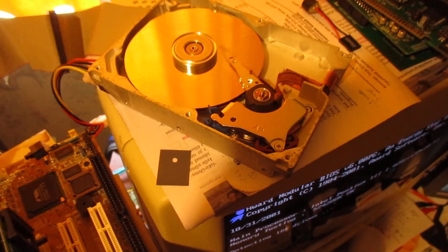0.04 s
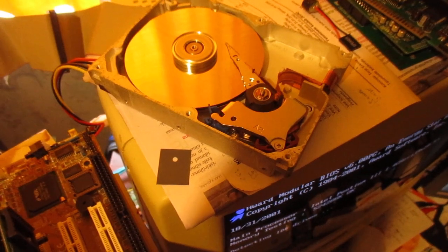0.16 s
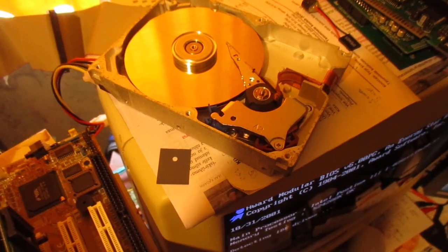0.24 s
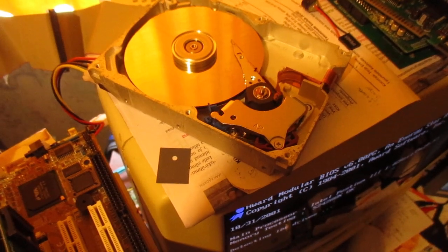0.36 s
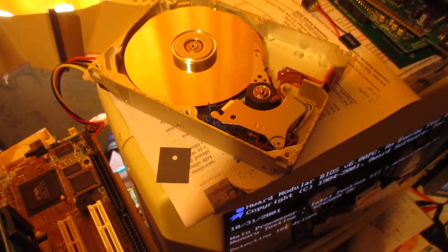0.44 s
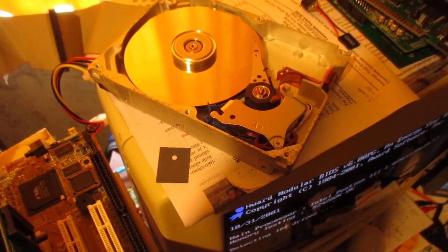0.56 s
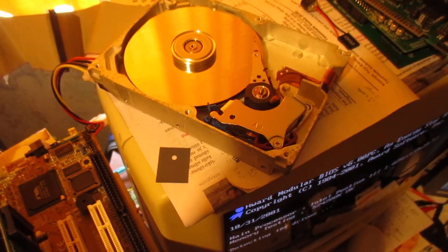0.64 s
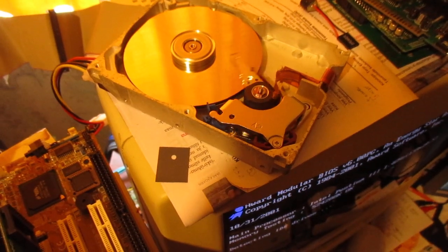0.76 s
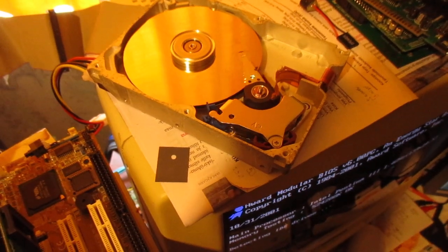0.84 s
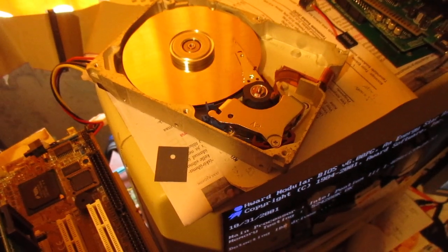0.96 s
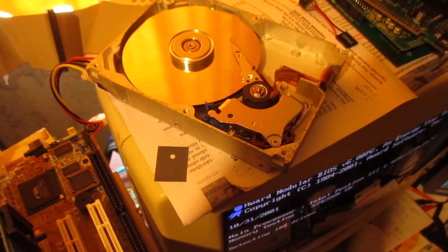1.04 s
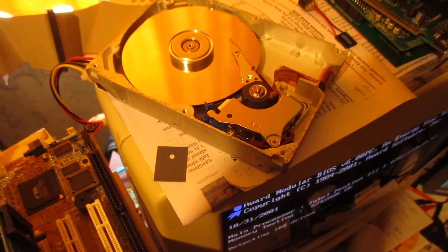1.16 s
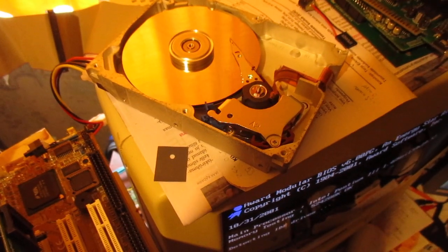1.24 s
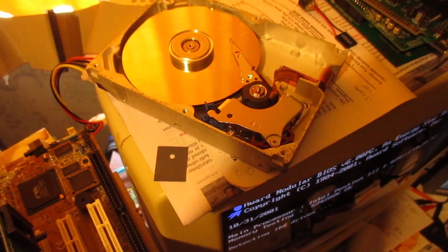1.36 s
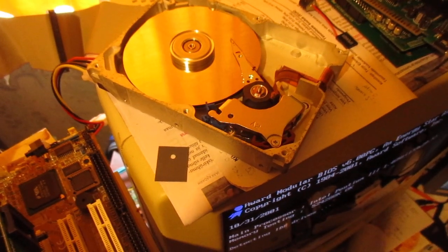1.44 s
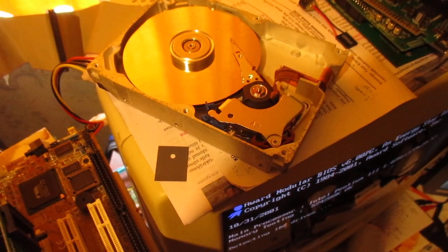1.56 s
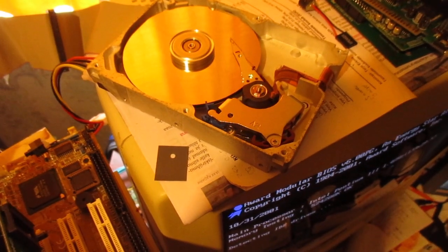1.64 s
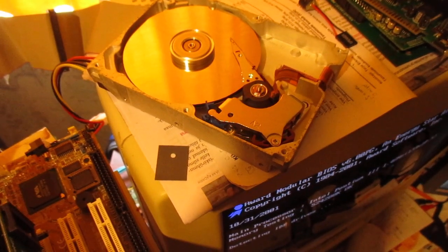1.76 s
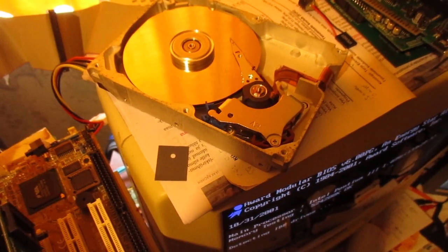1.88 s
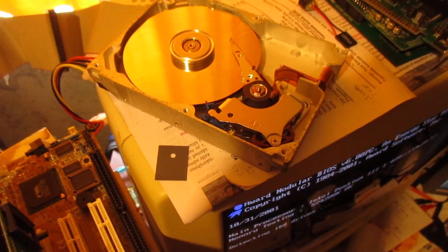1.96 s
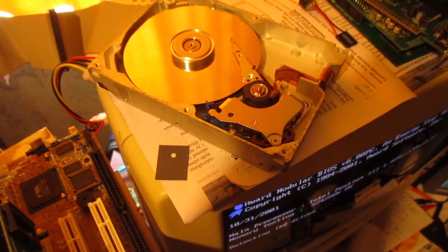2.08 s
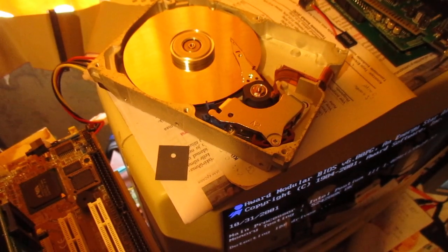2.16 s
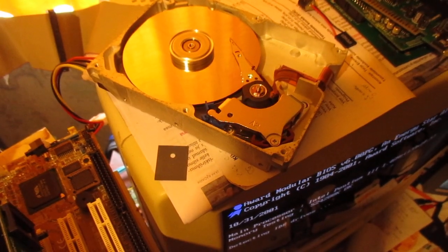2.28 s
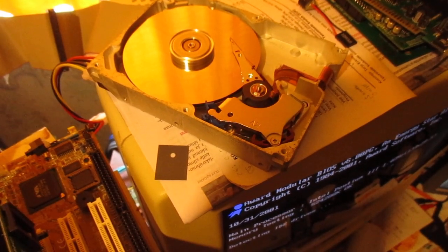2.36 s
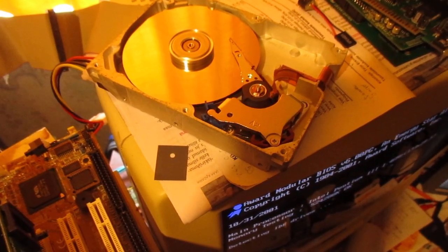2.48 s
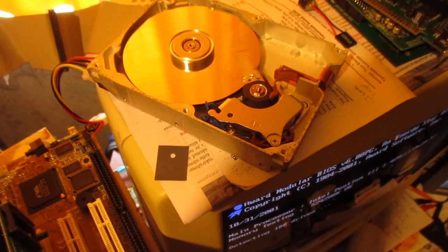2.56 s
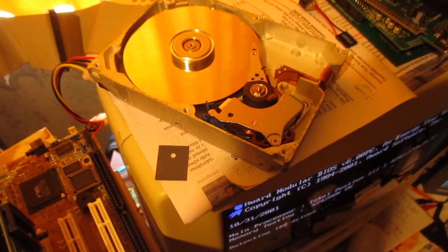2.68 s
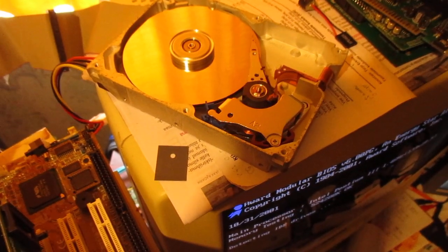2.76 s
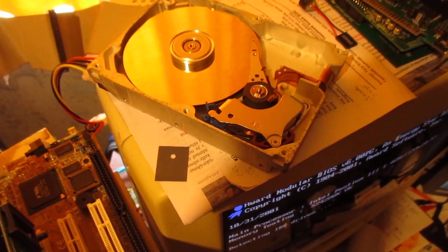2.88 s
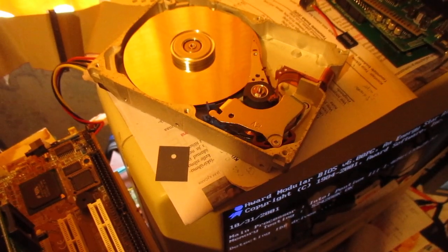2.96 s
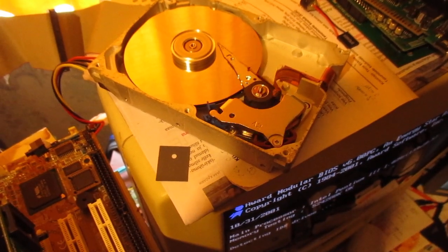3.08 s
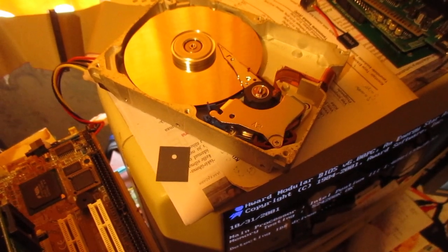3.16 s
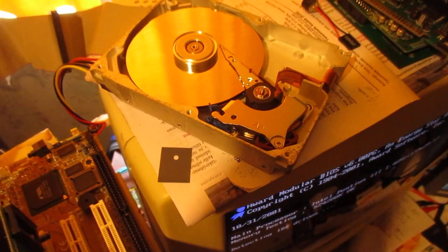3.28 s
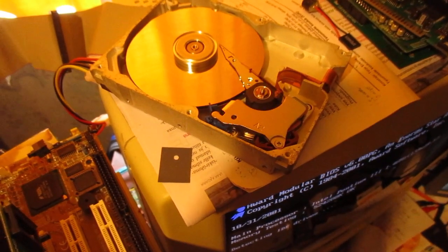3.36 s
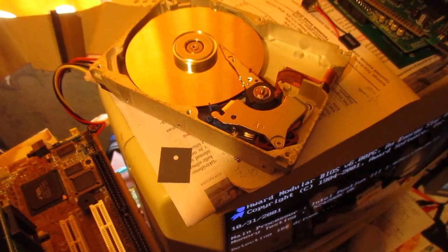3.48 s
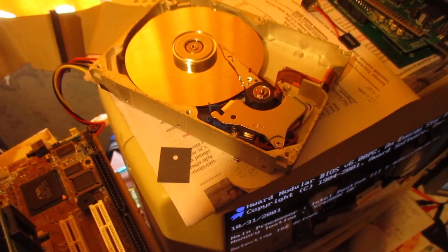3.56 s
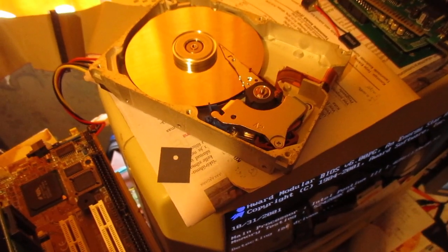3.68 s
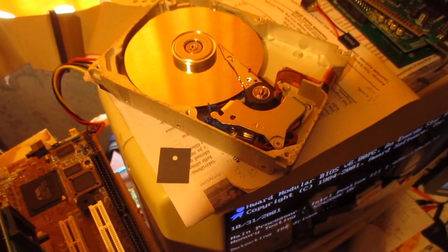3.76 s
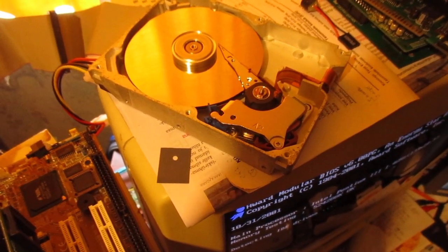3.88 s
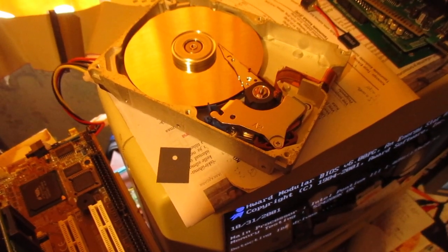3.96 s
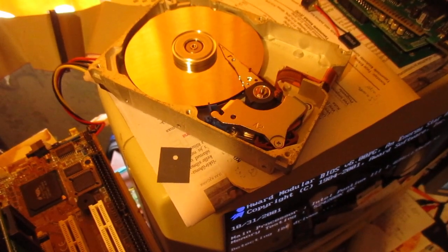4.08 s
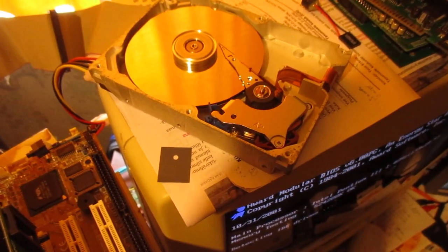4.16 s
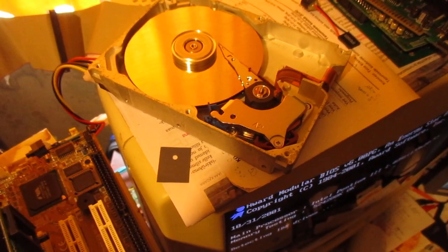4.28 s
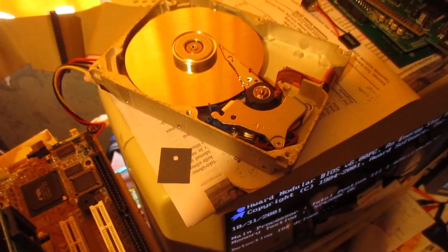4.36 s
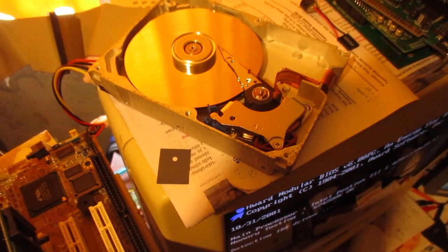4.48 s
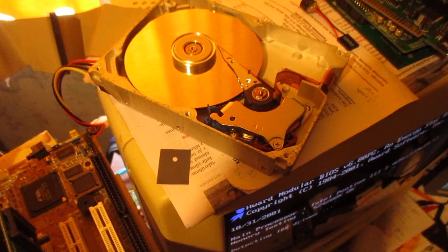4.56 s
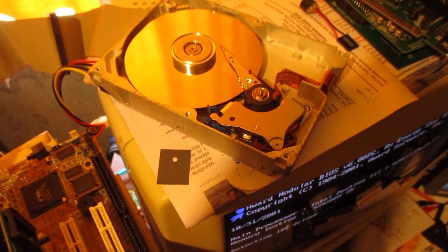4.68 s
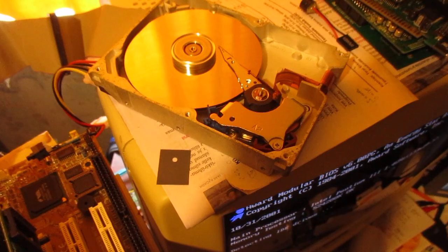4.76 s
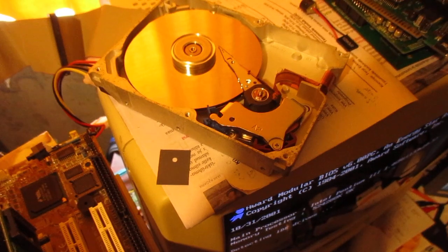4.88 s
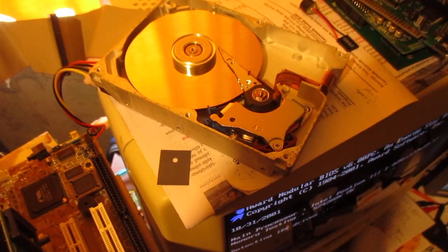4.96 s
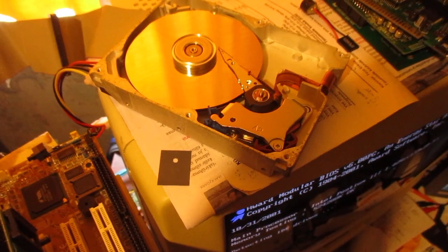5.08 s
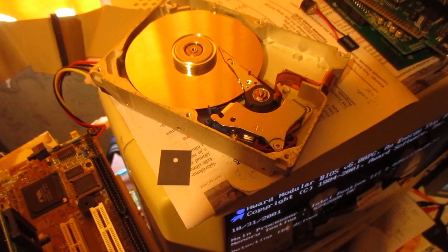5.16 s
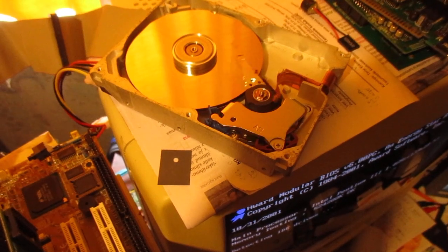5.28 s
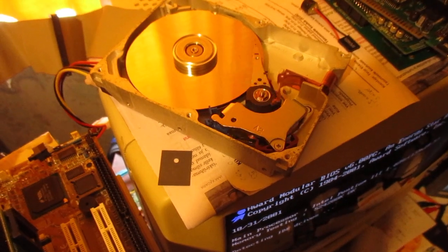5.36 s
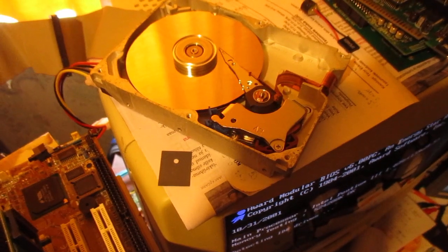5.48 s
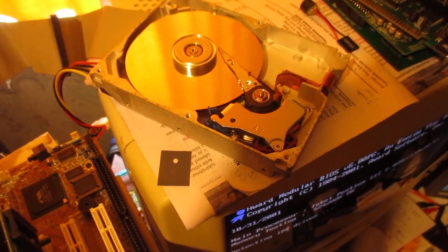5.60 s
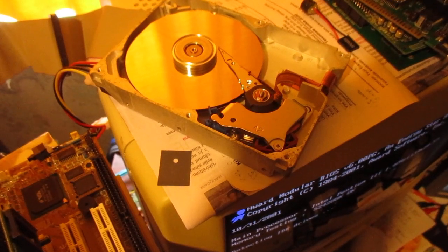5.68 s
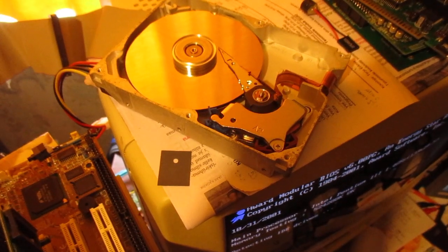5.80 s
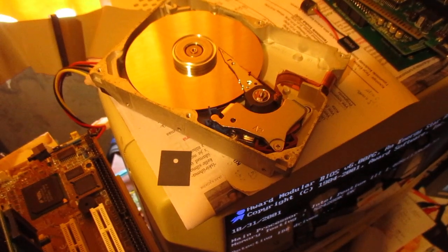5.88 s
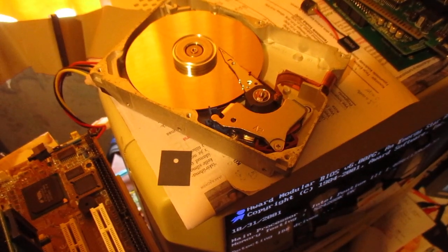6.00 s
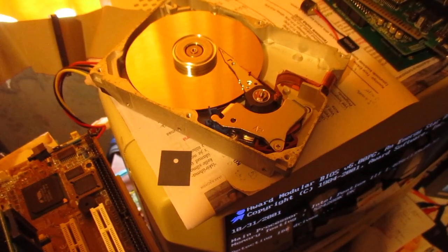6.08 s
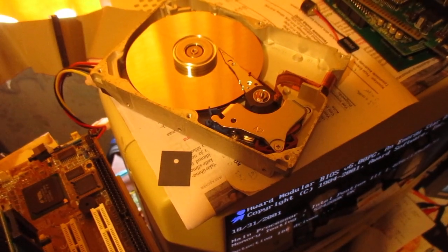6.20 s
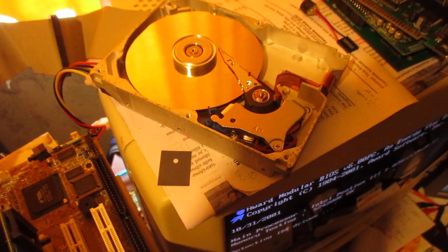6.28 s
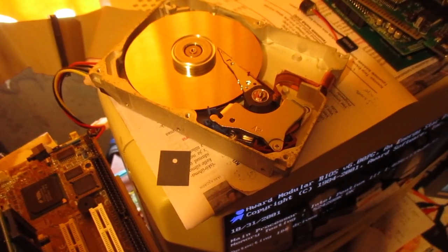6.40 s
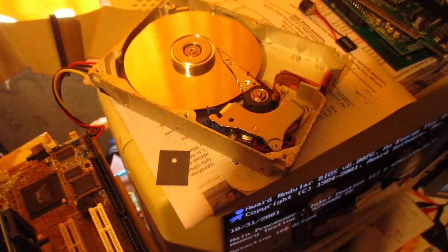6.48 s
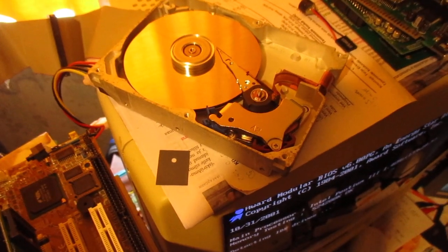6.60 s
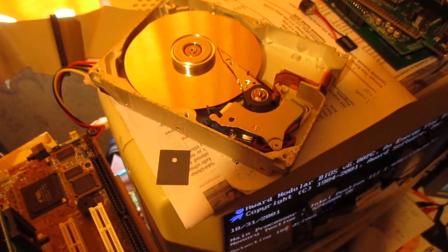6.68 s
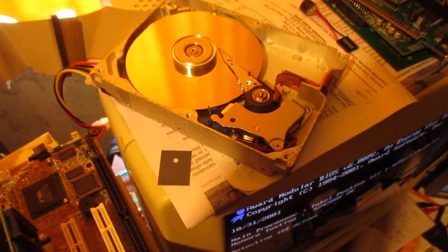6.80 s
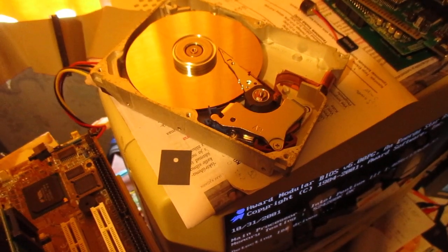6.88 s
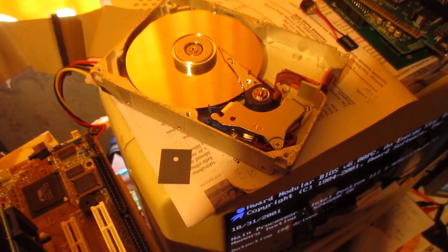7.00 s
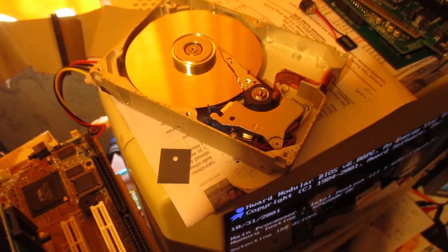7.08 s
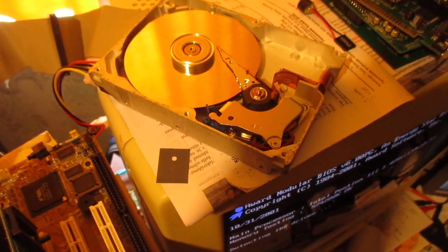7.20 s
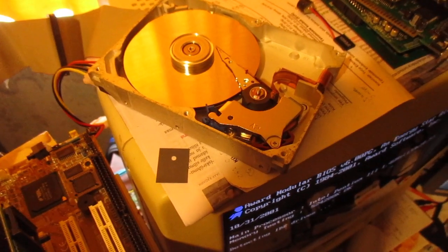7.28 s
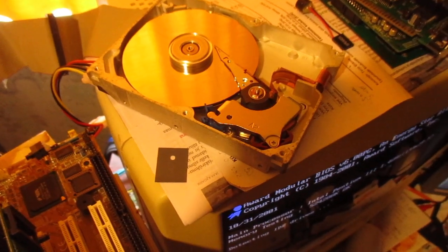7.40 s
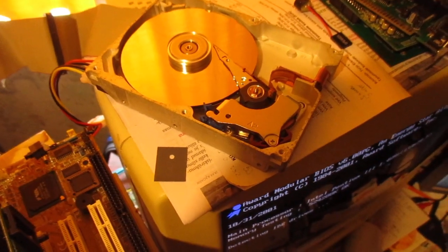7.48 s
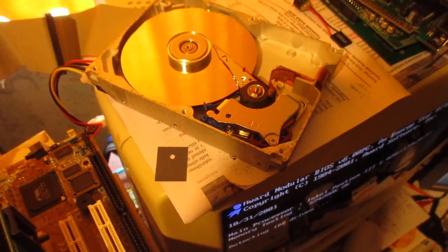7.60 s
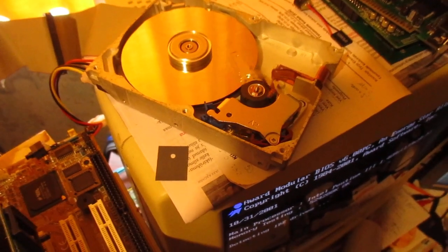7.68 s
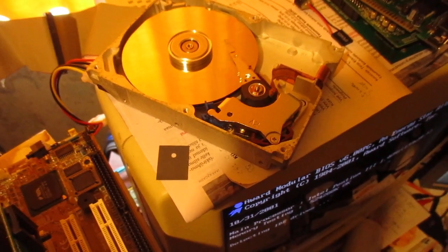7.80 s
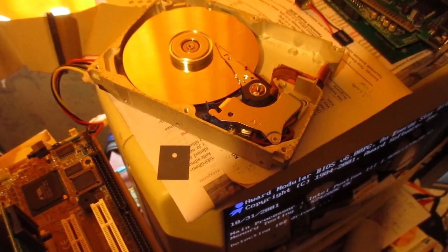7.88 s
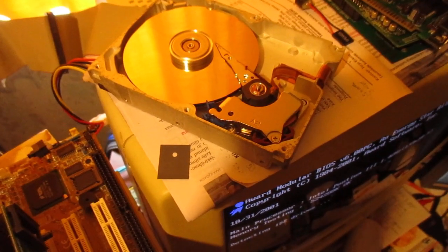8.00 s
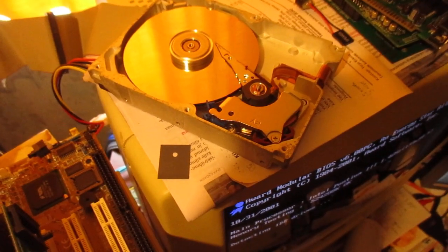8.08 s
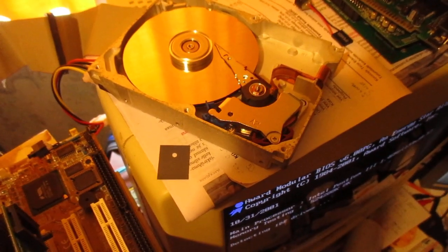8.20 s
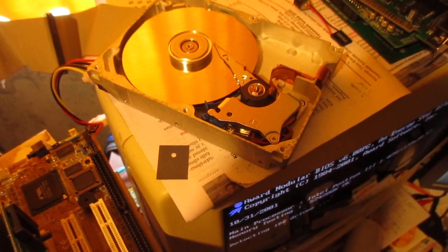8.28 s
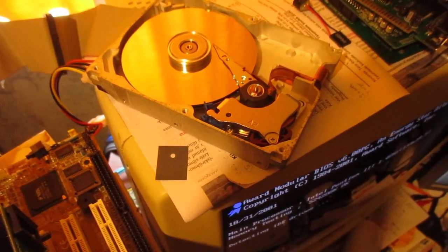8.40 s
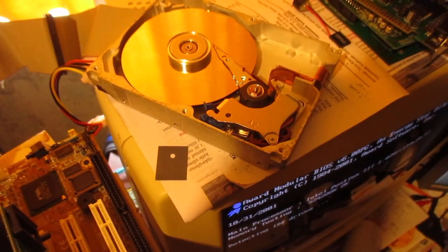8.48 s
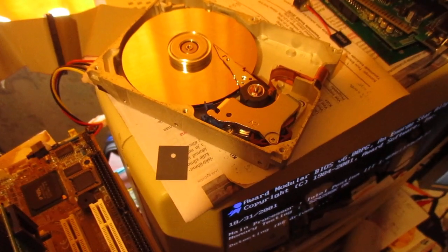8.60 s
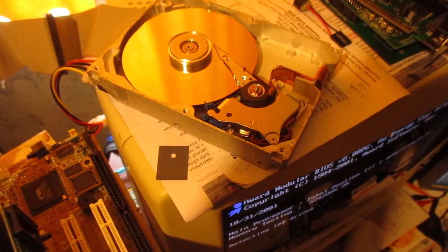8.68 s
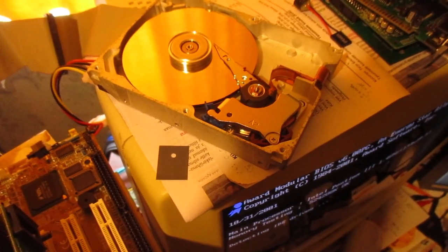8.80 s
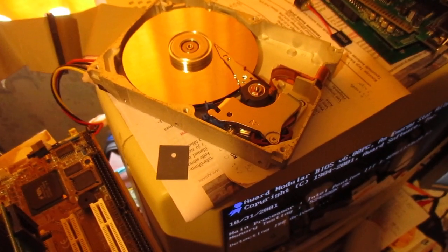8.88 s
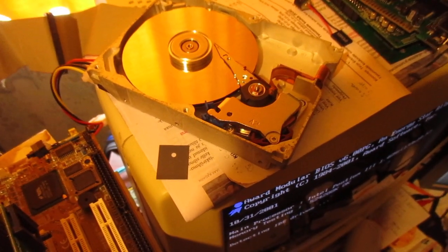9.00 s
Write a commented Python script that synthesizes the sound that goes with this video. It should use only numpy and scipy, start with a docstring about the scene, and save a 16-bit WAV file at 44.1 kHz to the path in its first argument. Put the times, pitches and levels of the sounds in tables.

```python
"""On a desk in a small room lies an opened hard drive, heard from close by.
Four times its spindle speeds up, coasts back and is caught again by the motor.
Ball bearing and motor sing thin tones that swell as they cross the resonances of the metal case,
over a roar of bearing and platter wind. The head arm swings into its stop and bounces."""
import sys
import numpy as np
from scipy import signal
from scipy.fft import rfft, irfft
from scipy.io import wavfile
from scipy.ndimage import uniform_filter1d

SR = 44100
rng = np.random.default_rng(int(sys.argv[2]) if len(sys.argv) > 2 else 0)


def log_audio(samples):
    """Write samples as a 16-bit WAV file to the path given in sys.argv[1]."""
    # one column per channel
    frames = np.atleast_2d(samples).T
    # limit to full scale, then quantise
    limited = np.clip(frames, -1, 1)
    pcm = np.round(limited * 32767).astype(np.int16)
    wavfile.write(sys.argv[1], SR, pcm)


N = 399099
STEP = 100  # samples between the values of a slow curve
SHAFT_PER_BALL = .10983  # shaft turns for each ball that rolls past


def undb(db):
    """Turn decibels into a gain."""
    return 10 ** (np.asarray(db) / 20)


def wander(rate_hz):
    """A slow curve that drifts at random, with a spread of 1."""
    width = max(int(SR / STEP / rate_hz), 2)
    drift = uniform_filter1d(uniform_filter1d(rng.standard_normal(N // STEP + 2), width), width)
    return drift / drift.std()


def filtered(x, gain):
    """Make each frequency f louder or softer by gain(f)."""
    return irfft(rfft(x) * gain(np.fft.rfftfreq(N, 1 / SR)), N)


def desk_echo(x, t60_s=0.15, wet_db=-14):
    """Desk and room add a short tail that fades by 60 dB in t60_s."""
    t = np.arange(SR // 3) / SR
    tail = rng.standard_normal(len(t)) * np.exp(-np.log(1000) * t / t60_s) * np.minimum(t / 0.033, 1)
    return x + undb(wet_db) * signal.fftconvolve(x, tail / np.sqrt(np.sum(tail ** 2)))[:N]


# Spindle cycles: speeds up t/s, switched off t/s, caught t/s, time constant of the climb t/s
SPIN_CYCLES = [(.76, 1.818, 2.244, .796), (3.023, 3.843, 4.363, 1.029), (5.444, 6.18, 6.742, 1.027),
               (7.823, 8.585, 9.105, .927)]
def ball_rate():
    """Balls rolling past per second: the rate climbs, coasts evenly down, is caught and settles."""
    hold_hz, peak_hz, caught_hz = 487.47, 537.16, 485.26
    settle_s, inertia_s = .113, .051
    t = np.arange(N) / SR
    hz = 488.47 - 4.38 * t  # sags a little before the first climb
    for climb, coast, caught, lag_s in SPIN_CYCLES:
        start_hz = hz[int(climb * SR)]
        climbed = np.expm1((climb - t) / lag_s) / np.expm1((climb - coast) / lag_s)
        hz = np.where(t > climb, start_hz + (peak_hz - start_hz) * climbed, hz)
        hz = np.where(t > coast, peak_hz - (peak_hz - caught_hz) * (t - coast) / (caught - coast), hz)
        hz = np.where(t > caught, hold_hz - (hold_hz - caught_hz) * np.exp((caught - t) / settle_s), hz)
    width = int(inertia_s * SR)
    return uniform_filter1d(uniform_filter1d(hz, width, mode="nearest"), width, mode="nearest")


def spindle_state():
    """Three slow curves from 0 to 1: holding speed, speeding up, coasting."""
    t = np.arange(N // STEP + 2) * STEP / SR
    rising = sum((t > climb) * (t <= coast) * 1. for climb, coast, _, _ in SPIN_CYCLES)
    coasting = sum((t > coast) * (t <= caught) * 1. for _, coast, caught, _ in SPIN_CYCLES)
    rising, coasting = uniform_filter1d([rising, coasting], size=6)
    return np.array([1 - rising - coasting, rising, coasting])


# Pitches at which the cast metal case rings: f/Hz, width/Hz, level/dB
CASE_RESONANCES = [(494.5, 8.4, 14.5), (2759, 58, 20), (2916, 149, 18.5), (3246, 450, 7.5),
                   (3693, 107, 7.5), (3860, 180, 4.5), (4266, 170, 7), (4610, 59, 19), (4810, 60, 18),
                   (4980, 280, 12.5), (5360, 510, 9), (5696, 345, 14.5), (6325, 226, 12.5),
                   (7647, 580, 9.5), (8385, 163, 14.5), (8916, 200, 7.5), (9330, 250, 3), (9760, 200, 11.5),
                   (10480, 180, 9.5), (11290, 280, 17.5), (11750, 81, 11), (11600, 55, 7), (12600, 183, 5),
                   (13089, 77, 5), (13280, 125, -1)]
def case_gain(f):
    """The case boosts sound near its resonances, above a flat floor of -2 dB."""
    peaks = sum(undb(db) ** 2 / (1 + (2 * (f - hz) / width) ** 2) ** 2
                for hz, width, db in CASE_RESONANCES)
    return np.sqrt(undb(-2) ** 2 + peaks)


# Tone colour of the roar, with the room's rumble beneath: f/Hz, relative level/dB
ROAR_COLOUR = [(15, -48), (25, -16), (120, -7), (659, -8), (734, -5.5), (1290, -10.5), (1940, 0.5),
               (2410, -7.5), (2840, -3.5), (3620, -14), (4740, -9), (5430, -14.5), (10400, -26.5),
               (11600, -22), (16000, -26.5)]
# How loud the roar is over time: t/s, level/dB between 1500 and 2400 Hz
ROAR_LOUDNESS = [(0.0, -49), (0.15, -45.5), (0.73, -45), (1.39, -43.5), (5.22, -46), (5.44, -44),
                 (7.08, -46), (9.05, -45)]
def roar(ball_passes):
    """Bearing and platter wind shake the case: noise, plus a rough pattern that repeats every turn."""
    pattern = rng.standard_normal(1024)
    repeating = np.interp(SHAFT_PER_BALL * ball_passes % 1, np.arange(1024) / 1023, pattern)
    repeating = filtered(repeating, lambda f: 1 / (1 + (1700 / (f + 1)) ** 6))  # fine grain, no bass
    throb = 1 + 0.28 * np.sin(2 * np.pi * ball_passes)
    rough = rng.standard_normal(N) * throb + 0.87 * repeating
    hz, db = np.transpose(ROAR_COLOUR)

    def colour(f):
        shape = undb(np.interp(np.log(f + 1), np.log(hz), db))
        softer_top = 0.49 + 0.49 / (1 + (f / 12100) ** 30)
        return shape * case_gain(f) ** 0.27 * softer_top

    noise = filtered(rough, colour)
    middle = filtered(noise, lambda f: (f > 1500) * (f < 2400))
    rumble = filtered(noise, lambda f: 1 / (1 + (f / 900) ** 4))  # this part stays steady
    level = undb(np.interp(np.arange(N) / SR, *np.transpose(ROAR_LOUDNESS)))
    return ((noise - rumble) * level + rumble * level.mean()) / middle.std()


# A high band of hiss: f/Hz, width/Hz, level/dB, extra when it flares/dB, reach of the flare/Hz
HISS_BAND = (11290, 500, -65.5, 7.5, 90)
def hiss(ball_hz):
    """Bearing noise feeds a high resonance, which flares when a multiple of the ball rate crosses it."""
    hz, width_hz, db, flare_db, reach_hz = HISS_BAND
    miss_hz = hz - np.round(hz / ball_hz) * ball_hz
    band = filtered(rng.standard_normal(N), lambda f: 1 / (1 + (2 * (f - hz) / width_hz) ** 4))
    return undb(db + flare_db * np.exp(-(miss_hz / reach_hz) ** 2)) * band / band.std()


def tone(cycles, level, flutter_db=1.2):
    """One thin tone that follows the spindle; its loudness flutters and slowly swells."""
    flutter = undb(flutter_db * (wander(rate_hz=27) + 1.52 * wander(rate_hz=3.3)))
    loudness = np.interp(np.arange(N), np.arange(len(flutter)) * STEP, level * flutter)
    return np.sqrt(2) * loudness * np.sin(2 * np.pi * (cycles + rng.random()))


# Three tones around 1, 2, 3... times the ball rate, before the case boosts them:
# lower level/dB, middle level/dB, upper level/dB, change speeding up/dB, change coasting/dB
BEARING_TONES = [(-113, -90, -64, 1, 0.5), (-113, -94, -77, 11, -7), (-67, -71, -73, 7, 0),
                 (-78, -54.5, -72, 2, 3.5), (-58, -83, -61, 7, 5), (-60.5, -68, -61, 0, 1.5),
                 (-65, -57.5, -66, 2, -2.5), (-64, -64.5, -74, 3, 2), (-64, -58, -59.5, -5.5, -5.5),
                 (-88, -71, -71, 4, 2.5), (-92, -65, -76.5, 7.5, -3.5), (-75, -61, -80, -3.5, 1),
                 (-79, -65.5, -76, 3, -1.5), (-72, -63, -72, -3, -1), (-79, -63, -69, -0.5, -3),
                 (-70.5, -61, -95, -3.5, -3), (-88, -74.5, -90, 7, 4.5), (-90, -62.5, -78, -3.5, -1.5),
                 (-76, -69.5, -73, 3, 1.5), (-81, -67.5, -81, -1, -3), (-85, -78, -88, 1, 1),
                 (-82, -75, -77, -14, -8), (-87, -78.5, -83, -2, 4.5), (-77, -82, -80.5, 6, -5)]
def bearing(ball_passes, state):
    """Rolling balls sing overtones, each with a neighbour about one shaft rate below and above."""
    shaft_turns, out = SHAFT_PER_BALL * ball_passes, np.zeros(N)
    for k, (lower_db, middle_db, upper_db, rise_db, coast_db) in enumerate(BEARING_TONES, start=1):
        load = undb([0, rise_db, coast_db]) @ state
        for side, db in ((-1, lower_db), (0, middle_db), (0.98, upper_db)):
            out += tone(k * ball_passes + side * shaft_turns, undb(db) * load)
    return out


# Pitches of more spindle tones: multiple of the ball rate
SPINDLE_PITCHES = [0.949, 5.199, 5.309, 5.607, 6.38, 6.766, 7.44, 8.499, 8.786, 9.449, 9.559, 9.669, 9.8907,
                   10.619, 12.749, 13.809, 21.966]
# Their strength before the case: holding level/dB, speeding up level/dB, coasting level/dB
SPINDLE_LEVELS = [(-90, -68, -74), (-80, -63, -62.5), (-85, -68.5, -66.5), (-95, -65.5, -82),
                  (-61.5, -59.5, -62.5), (-62, -95, -58.5), (-76, -68.5, -61), (-59, -62, -60),
                  (-73, -65.5, -81), (-77, -64.5, -69), (-87, -70, -66), (-70, -67, -68), (-75.5, -90, -88),
                  (-70, -69, -74), (-72, -67, -67), (-75, -73, -83), (-75, -82, -90)]
def spindle(ball_passes, state):
    """The spindle also sings at pitches that are not whole multiples of the ball rate."""
    return sum(tone(k * ball_passes, undb(db) @ state, flutter_db=1.5)
               for k, db in zip(SPINDLE_PITCHES, SPINDLE_LEVELS))


# Pitches of the motor: multiple of the shaft rate
MOTOR_PITCHES = [60, 90, 120, 140, 150, 160, 180, 195, 210, 235, 240, 245, 270]
# Their strength before the case: holding level/dB, speeding up level/dB
MOTOR_LEVELS = [(-64.5, -68.5), (-63, -73), (-55.5, -52.5), (-67, -65.5), (-81, -92), (-77, -75),
                (-53.5, -57), (-79, -73.5), (-83, -77), (-70, -90), (-63, -69), (-71, -90), (-76, -90)]
def motor(shaft_turns, state):
    """The motor sings while it drives the spindle and is silent while it coasts."""
    return sum(tone(k * shaft_turns, undb(db) @ state[:2], flutter_db=.6)
               for k, db in zip(MOTOR_PITCHES, MOTOR_LEVELS))


# Two very high tones: multiple of the shaft rate, level/dB
CHIRP_TONES = [(219.6, -52.5), (229.6, -62)]
def chirp(shaft_turns, ball_hz, rising):
    """A pair of tones sings only within a narrow range of speeds on the way up."""
    from_hz, to_hz = 507, 526
    hz = np.interp(np.arange(len(rising)) * STEP, np.arange(N), ball_hz)
    swell = np.clip((hz - from_hz) / 12, 0, 1) * np.clip(to_hz - hz, 0, 1) * rising
    return sum(tone(k * shaft_turns, undb(db) * swell) for k, db in CHIRP_TONES)


def whine(ball_hz, ball_passes):
    """Bearing, spindle and motor sound through the case, with the chirp on top."""
    state, shaft_turns = spindle_state(), SHAFT_PER_BALL * ball_passes
    tones = bearing(ball_passes, state) + spindle(ball_passes, state) + motor(shaft_turns, state)
    return filtered(tones, case_gain) + chirp(shaft_turns, ball_hz, rising=state[1])


def ring(modes, t, bright_db_per_octave=0, rise_s=0.0003):
    """A struck part rings with fading tones whose strength and pitch vary a little by chance."""
    hz, db, t60 = np.transpose(modes)[:, :, None]
    level_luck, pitch_luck = rng.standard_normal((len(modes), 2)).T[:, :, None]
    gain = undb(db + bright_db_per_octave * np.log2(np.maximum(hz, 1900) / 2500) + 2.0 * level_luck)
    fade = np.exp(-np.log(1000) * t / t60)
    waves = gain * fade * np.sin(2 * np.pi * hz * (1 + 0.0023 * pitch_luck) * t)
    return (1 - np.exp(-t / rise_s)) * waves.sum(axis=0) / np.sqrt(np.sum(undb(db) ** 2))


# How the frame and the desk under it ring: f/Hz, relative level/dB, time to fade by 60 dB t/s
FRAME_RING = [(211, -20.5, 0.092), (341, -18.5, 0.061), (499, -23, 0.21), (603, -18, 0.092),
              (1112, -16, 0.18), (1494, 3.5, 0.028), (1644, -3, 0.057), (1915, -1, 0.13), (2068, 3, 0.047),
              (2330, 3.5, 0.053), (3020, -12.5, 0.14), (3980, -7, 0.05), (4604, 3.5, 0.083),
              (4700, -2.5, 0.15), (4976, 1, 0.045), (5980, 1, 0.016), (8410, -14, 0.032),
              (11800, -15.5, 0.053)]
# How the arm rings: f/Hz, relative level/dB, time to fade by 60 dB t/s
ARM_RING = [(2150, -13.5, 0.032), (2576, -5, 0.038), (2812, 2, 0.019), (3770, -3.5, 0.0078),
            (5120, -15, 0.044), (6240, -10, 0.045), (6860, -46, 0.018), (8310, -16, 0.022)]
# Blows on the stop: t/s, frame level/dB, arm level/dB
ARM_BLOWS = [(0.0014, -18, -32), (0.0259, -11, -17.5), (0.0633, -14.5, -22), (0.0948, -15, -22),
             (0.124, -21.5, -20), (0.3827, -33, -19), (0.3857, -18.5, -23), (0.4008, -25, -22),
             (0.4484, -25.5, -18.5), (0.705, -22.5, -17.5), (0.767, -18.5, -24), (2.573, -26, -25),
             (2.6309, -22.5, -20.5), (2.7428, -25, -17.5), (2.8634, -37, -21), (3.0001, -10.5, -12.5),
             (3.0342, -8.5, -20), (3.065, -19, -34), (5.3224, -29, -21.5), (5.3564, -22, -26),
             (5.3961, -8, -6), (5.4295, -8.5, -14), (5.462, -18, -26), (5.4805, -19.5, -33),
             (7.6782, -33, -18.5), (7.7184, -26.5, -20), (7.7899, -4.5, -12), (7.8106, -5, -14),
             (7.8562, -16, -37), (7.8785, -23, -36)]
# Quick ticks leading into the last big blows: start t/s, end t/s, tick rate f/Hz
ARM_CHATTER = (7.7675, 7.7915, 416)
def head_arm():
    """The arm hits its stop: a crack, a rattle, and arm and frame ring. Once it also chatters."""
    out, t = np.zeros(N + SR), np.arange(SR // 4) / SR
    treble = signal.butter(2, [11500, 16000], "band", fs=SR, output="sos")
    middle = signal.butter(1, [1300, 3500], "band", fs=SR, output="sos")
    for s, frame_db, arm_db in ARM_BLOWS:
        # a harder blow cracks more and rings brighter
        crack_db, brightness = 0.5 + 1.95 * frame_db, 3.5 + 0.43 * frame_db
        crack_fade = np.exp(-t / 0.00088) + 0.16 * np.exp(-t / 0.0083)
        crack = signal.sosfilt(treble, rng.standard_normal(len(t)) * crack_fade)
        crack /= np.abs(crack).max()
        rattle = 0.39 * signal.sosfilt(middle, rng.standard_normal(len(t)) * np.exp(-t / 0.0074))
        frame = ring(FRAME_RING, t, brightness, rise_s=0.0016) + rattle
        blow = undb(frame_db) * frame + undb(arm_db) * ring(ARM_RING, t) + undb(crack_db) * crack
        at = int(s * SR)
        out[at:at + len(t)] += blow
    start, end, rate_hz = ARM_CHATTER
    for s in np.arange(start, end, 1 / rate_hz):
        scrape = .5 * rng.standard_normal(len(t)) * np.exp(-t / 0.0013)
        tick = ring(ARM_RING, t, bright_db_per_octave=-8) + signal.sosfilt(middle, scrape)
        fade_in = min((s - start) / 0.0029 + 0.24, 1)
        at = int(s * SR)
        out[at:at + len(t)] += undb(-7) * fade_in * tick
    return out[:N]


def scene():
    """Whine, hiss and roar follow one spindle speed while the arm knocks; one channel."""
    ball_hz = ball_rate()
    ball_passes = np.cumsum(ball_hz) / SR
    singing = desk_echo(whine(ball_hz, ball_passes), t60_s=0.035, wet_db=-10)
    return (singing + hiss(ball_hz) + roar(ball_passes) + desk_echo(head_arm()))[None]


def record(dry):
    """A small camera microphone cuts the treble above 15700 Hz."""
    return signal.sosfilt(signal.ellip(8, .2, 60, 15700, fs=SR, output="sos"), dry)


dry = scene()
out = record(dry)
log_audio(out)
```